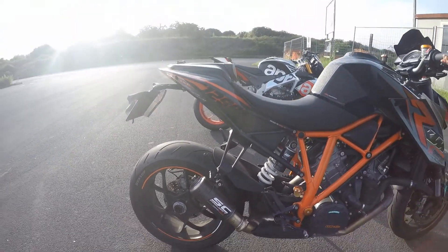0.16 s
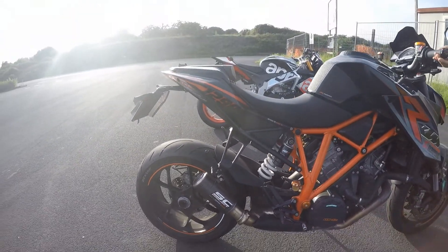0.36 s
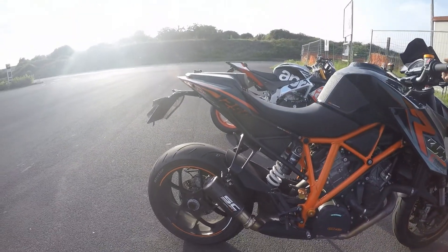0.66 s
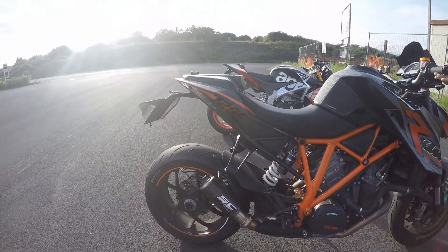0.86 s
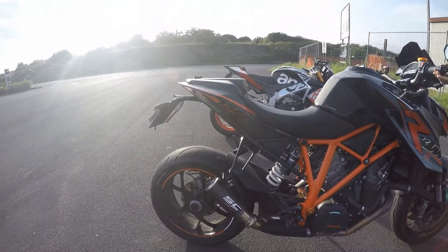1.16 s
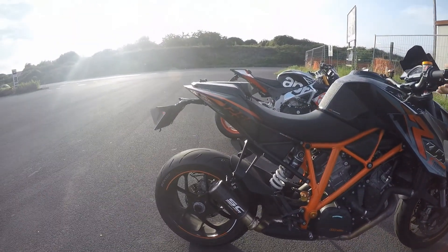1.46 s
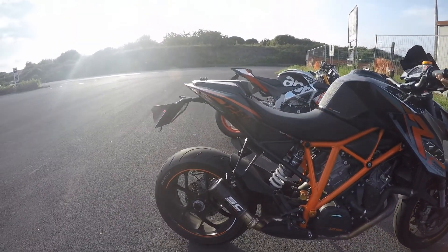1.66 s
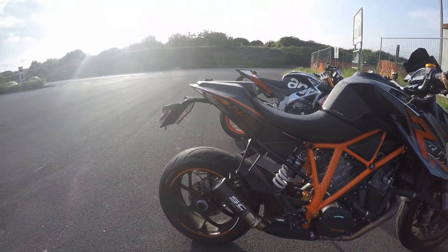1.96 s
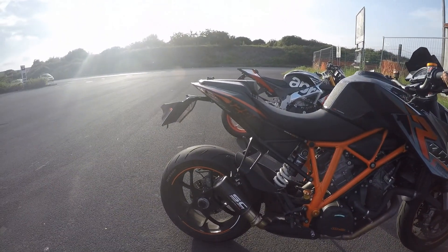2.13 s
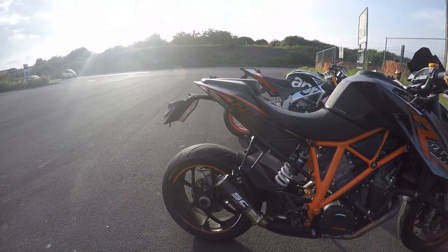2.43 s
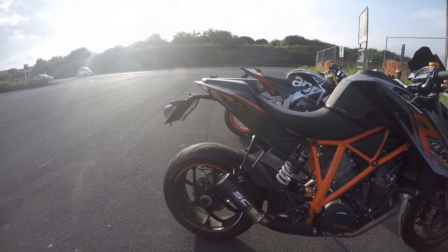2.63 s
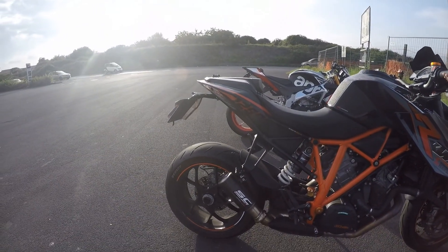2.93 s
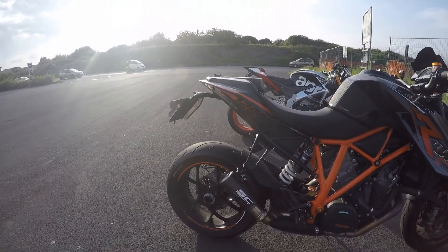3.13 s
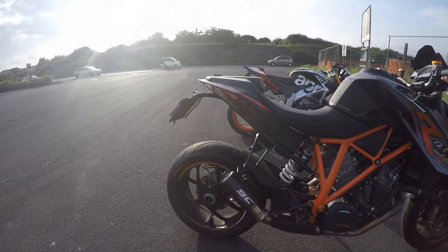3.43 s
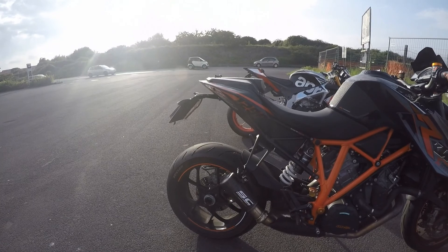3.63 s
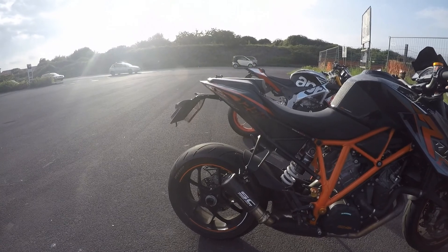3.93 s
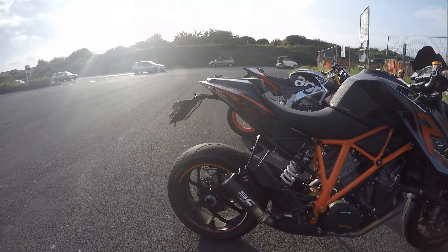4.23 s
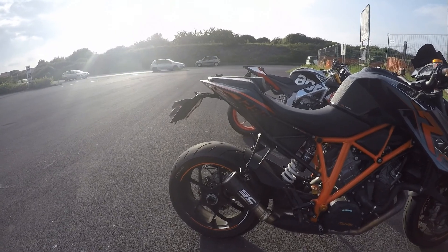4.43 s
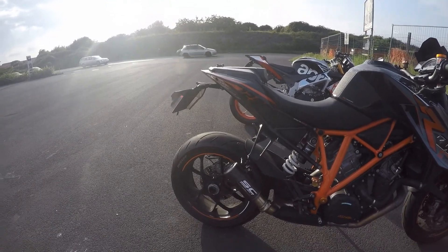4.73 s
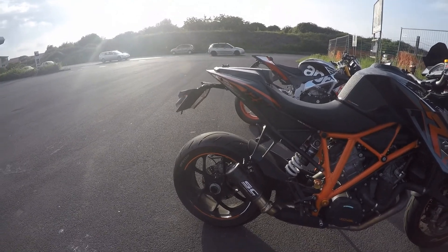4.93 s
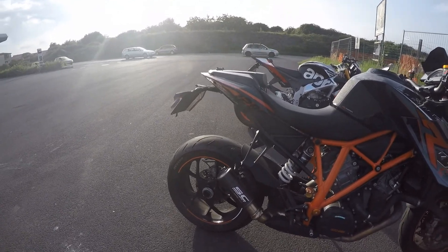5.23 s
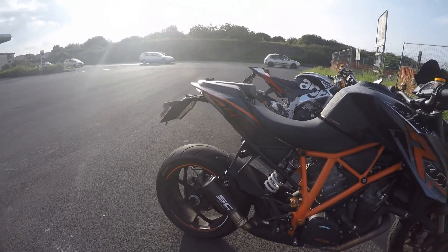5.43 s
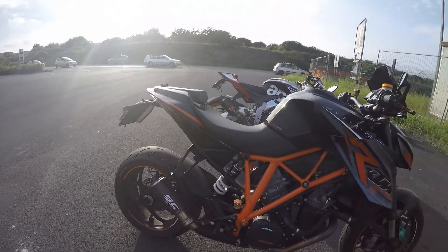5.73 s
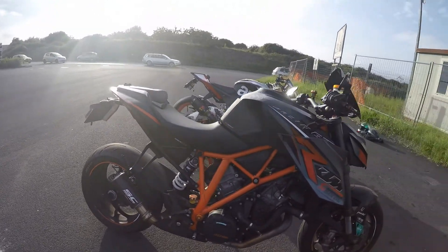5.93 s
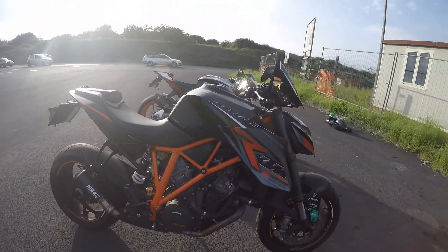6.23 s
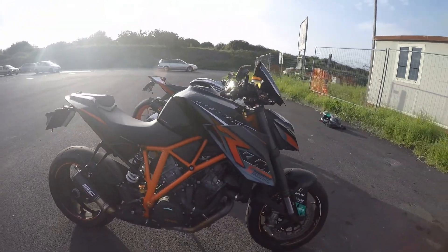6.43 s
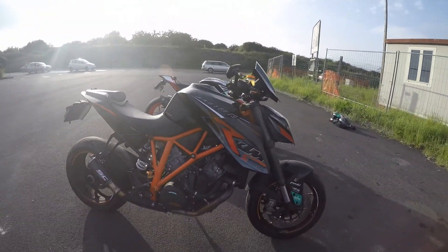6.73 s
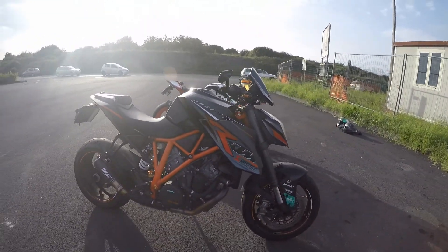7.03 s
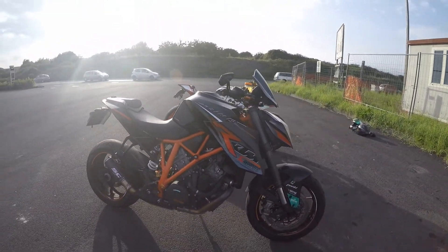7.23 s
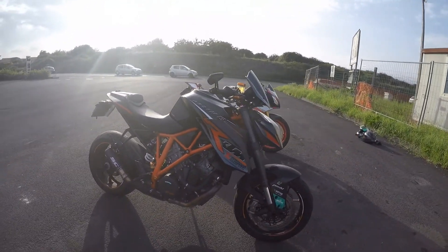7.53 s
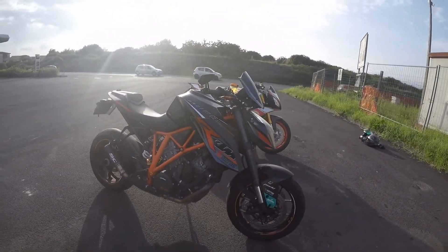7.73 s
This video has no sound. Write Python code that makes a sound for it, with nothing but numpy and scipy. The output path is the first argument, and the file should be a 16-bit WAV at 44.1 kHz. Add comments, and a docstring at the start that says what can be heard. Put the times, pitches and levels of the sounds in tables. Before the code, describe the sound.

A big twin-cylinder motorcycle idles outdoors with an uneven thump and mechanical clatter, heard close to its exhaust. It is blipped five times, the second highest, each sharp bark falling away in a round growl with hiss and light gear whine. The engine then returns to idle while the microphone moves round to its side, picking up a few bumps, clicks and a small clink over faint outdoor rumble.

```python
"""A big V-twin motorcycle thumps at idle through a short open silencer, then is blipped five times.
Uneven firings ring the exhaust, the pistons pump on the overrun, valves and gears clatter and whine,
chains and intake hiss at high revs. A faint outdoor rumble lies underneath. Near the end the
microphone is carried round to the bike's flank and picks up a few bumps, clicks and a clink."""
import sys
import numpy as np
from scipy import signal
from scipy.fft import rfft, irfft
from scipy.io import wavfile
from scipy.ndimage import uniform_filter1d

SR = 44100
rng = np.random.default_rng(int(sys.argv[2]) if len(sys.argv) > 2 else 0)


def generate_wav(signal):
    """Clip the signal to [-1, 1] and save it as 16-bit WAV at the path in sys.argv[1]."""
    frames = np.transpose(np.atleast_2d(signal))
    scaled = np.clip(frames, -1, 1) * 32767
    pcm = np.round(scaled).astype(np.int16)
    wavfile.write(sys.argv[1], SR, pcm)


N = 347067
T = np.arange(N) / SR
BIN_HZ = np.arange(N // 2 + 1) * SR / N + 1e-3

# outdoor rumble spectrum: freq_hz, gain_db
AIR_EQ = [(20, -49), (60, 31), (150, 25), (500, -51.5), (2000, -33), (15000, -67)]
# microphone bumps: centre_s, level_db, pitch_hz, width_s
MIC_BUMPS = [(6.324, -3, 30.4, 0.0057), (6.425, -11, 30, 0.0133), (6.618, -11, 26.2, 0.023),
             (6.804, -15, 23.4, 0.032)]
# microphone housing clicks: start_s, click_db, decay_s, thud_db
MIC_CLICKS = [(6.617, -28, .004, -30), (6.687, -33, .002, -50), (6.78, -20, .003, -5),
              (7.117, -31, .006, -50), (7.432, -7.5, .0009, -40)]
# housing click spectrum: freq_hz, gain_db
HOUSING_EQ = [(300, -20), (600, -2), (1100, 9), (1700, -1.5), (2800, 4), (4000, -13), (9000, -40),
              (15000, -52)]
# microphone path from tail to flank: time_s, flank_share
MIC_PATH = [(0, 0.02), (5.2, 0.02), (6.1, 0.45), (7.2, 0.87), (7.87, 0.93)]
# balance along that path: time_s, firing_db, rasp_db, clatter_db
PATH_GAINS = [(0, -4, 3, 2), (2.4, -2, 0.5, 0), (5.1, -3.5, 0.5, -0.5), (5.8, -5, 2.5, 0), (6.4, -5, 1, 1),
              (7.1, -6.5, -0.5, 1.5), (7.87, -4, -4, -0.5)]
# tone change at the flank: freq_hz, gain_db
FLANK_EQ = [(120, -3.5), (340, -9), (800, 3.5), (1300, -6), (2250, -6.5), (2700, 4), (3000, -3),
            (3450, 1.5), (4200, -2.5), (7000, -2), (8200, -3), (10000, -9), (12000, 2)]

# hunting idle, in four-stroke cycles per second: time_s, cycle_hz
IDLE_SPEED = [(0, 12.75), (.2, 11.96), (.66, 11.03), (5, 11.83), (5.4, 11.95), (5.8, 12.26), (6.1, 11.56),
              (7.2, 11.75), (7.87, 11.57)]
# throttle blips: start_s, run_up_s, top_cycle_hz, coast_tau_s, burn_delay_s, burn_length_s
THROTTLE_BLIPS = [(.672, .177, 33.34, .501, .025, .08), (1.373, .206, 52.91, .472, .022, .092),
                  (2.57, .147, 36.62, .55, .005, .085), (3.245, .163, 44.49, .474, -.008, .098),
                  (3.905, .153, 43.48, .499, .008, .087)]

# gear tones: teeth_per_cycle, gain_db
GEAR_MESHES = [(157, 0), (136, -6), (110, -7), (240, -6)]
# chain and intake hiss spectrum: freq_hz, gain_db
RUSH_EQ = [(400, -26), (750, 1), (1300, -0.5), (2800, 5.5), (5500, -3.5), (8000, -8.5), (11000, -14.5),
           (15000, -25.5)]
# silencer knock spectrum: freq_hz, gain_db
TAP_EQ = [(150, -2), (350, 8), (450, -14), (600, -25), (1400, -16), (1900, 11), (2700, -12), (4800, 5),
          (6200, -35), (10000, -20), (15000, -35)]
# valve knocks: position_cycles, gain_db
VALVE_KNOCKS = [(.25, 2), (.33, -9), (.6, -6), (.7, -9), (.83, -7), (.97, -12)]
# engine case resonances: freq_hz, width_hz, gain_db
CASE_MODES = [(2725, 300, 19), (3142, 1220, 19), (3480, 315, 15.5), (3720, 260, 18), (4122, 1020, 11.5),
              (4645, 420, 15), (5684, 120, 12.5), (6780, 1200, 3), (9920, 980, 0)]
# broad clatter spectrum: freq_hz, gain_db
CLATTER_EQ = [(250, 6.5), (450, -2.5), (620, -18), (900, -9), (1250, -0.5), (1500, -22), (2500, -33.5),
              (4000, -2.5), (5700, 1.5), (6400, -7.5), (7500, -6), (8800, -10.5), (10000, -15.5),
              (11000, -18), (15000, -26.5)]
# silencer shell resonances: freq_hz, width_hz, gain_db
SHELL_MODES = [(1763, 200, 5.6), (1896, 300, 11.8), (2083, 185, 8.4)]
# suction strokes: position_cycles, width_cycles, amplitude
SUCTION_STROKES = [(.21, 0.058, -1.09), (.55, .04, -0.38), (.79, 0.049, -0.65)]
# resonances rung by suction: freq_hz, width_hz, gain_db
GROWL_MODES = [(57, 22, 7.5), (114.5, 33, 12), (185, 64, -5), (382, 180, 12)]
# piston pumping against speed: cycle_hz, gain_db
PUMPING_GAINS = [(11.5, -29), (14, -32), (18, -28.5), (24, -26), (32, -23), (42, -27), (53, -36)]
# exhaust pipe resonances: freq_hz, width_hz, gain_db
PIPE_MODES = [(66, 30, -46), (109.3, 44.7, 7), (198.6, 21, -5.5), (349, 79, 0), (432.7, 13.3, -1.5),
              (864, 59, 1), (1230, 690, -1)]


def undb(db):
    """Decibels to gain."""
    return 10 ** (np.asarray(db) / 20)


def unit(x):
    """Scale to rms 1."""
    return x / np.sqrt(np.mean(x ** 2))


def power_sum_db(*gains):
    """Sum gains by power, in dB."""
    return 10 * np.log10(sum(gain ** 2 for gain in gains))


def bell(x, width):
    """Gaussian pulse, peak 1."""
    return np.exp(-.5 * (x / width) ** 2)


def curves(table):
    """Columns of a timed table, per sample."""
    time_s, *columns = np.transpose(table)
    return [np.interp(T, time_s, column) for column in columns]


def colour(x, eq):
    """Filter by a spectral outline."""
    hz, db = np.transpose(eq)
    return irfft(rfft(x) * undb(np.interp(np.log(BIN_HZ), np.log(hz), db)), N)


def noise(eq):
    """Coloured noise, rms 1."""
    return unit(colour(rng.standard_normal(N), eq))


def ring(x, modes, order=1):
    """Parallel resonances; order 2 steepens the skirts."""
    out = 0
    for hz, width_hz, db in modes:
        b, a = signal.iirpeak(hz, hz / width_hz, fs=SR)
        out = out + undb(db) * signal.sosfilt([np.r_[b, a]] * order, x + 1e-18)
    return out


def wander(rate_hz):
    """Smooth random drift, rms 1."""
    hold = max(int(SR / rate_hz), 1)
    steps = np.repeat(rng.standard_normal(N // hold + 1), hold)
    return unit(uniform_filter1d(steps, hold)[:N])


def tail(x, decay_s):
    """Give each impulse an exponential tail."""
    return signal.lfilter([1], [1, -np.exp(-1 / (decay_s * SR))], x + 1e-18)


def swell(start_s, attack_s, end_s, release_s):
    """Trapezoid envelope, 0-1."""
    return np.clip(np.minimum((T - start_s) / attack_s, 1 - (T - end_s) / release_s), 0, 1)


def passes(cycle, position):
    """Samples where the crank passes a cycle position."""
    return np.flatnonzero(np.diff(np.floor(cycle - position)) > 0)


def knocks(cycle, rows, scatter_db):
    """Crank-locked impulses of scattered size."""
    out = np.zeros(N)
    for position, db in rows:
        at = passes(cycle, position)
        out[at] += undb(db + scatter_db * rng.standard_normal(len(at)))
    return out


def outdoor_air(level_db=-46, drift_db=2):
    """Faint, slowly drifting rumble."""
    return noise(AIR_EQ) * undb(level_db + drift_db * wander(2.1))


def clink(start_s=7.12, decay_s=.022):
    """A small loose part rings briefly."""
    age_s = np.maximum(T - start_s, 0)
    tones = sum(undb(db) * np.sin(2 * np.pi * hz * age_s) for hz, db in ((1170, -31), (2500, -37)))
    return tones * np.exp(-age_s / decay_s)


def mic_handling(thud_s=.002, rebound_s=.0066, rebound=.56):
    """Steps shake the microphone; its housing knocks and clicks."""
    thumps, clicks = np.zeros(N), np.zeros(N)
    for centre_s, db, hz, width_s in MIC_BUMPS:
        thumps += undb(db) * np.sin(2 * np.pi * hz * (T - centre_s)) * bell(T - centre_s, width_s)
    for start_s, click_db, decay_s, thud_db in MIC_CLICKS:
        clicks += undb(click_db) * (T >= start_s) * np.exp(-np.abs(T - start_s) / decay_s)
        age_s = T - start_s - thud_s
        push = np.exp(-(age_s / thud_s) ** 2)
        recoil = rebound * np.exp(-(age_s / rebound_s - 1) ** 2)
        thumps += undb(thud_db) * (push - recoil)
    return thumps + clicks * noise(HOUSING_EQ)


def crank_speed(coast_hz=7.03, bend=1.12):
    """Blips run the crank up; friction drags it towards coast_hz until the idle catches it."""
    idle_hz, = curves(IDLE_SPEED)
    cycle_hz = idle_hz
    for start_s, run_up_s, top_hz, coast_tau_s, *_ in THROTTLE_BLIPS:
        run_up = np.sin(np.pi / 2 * np.clip((T - start_s) / run_up_s, 0, 1)) ** bend
        coast = np.exp(-np.maximum(T - start_s - run_up_s, 0) / coast_tau_s)
        goal_hz = coast_hz + (top_hz - coast_hz) * coast
        start_hz = np.interp(start_s, T, cycle_hz)
        blip_hz = start_hz + (goal_hz - start_hz) * run_up
        cycle_hz = np.where(T > start_s, np.maximum(idle_hz, blip_hz), cycle_hz)
    return cycle_hz


def engine_load(cycle_hz, catch_hz=5.9, fill_s=.013, empty_s=.16, attack_s=.018, release_s=.042):
    """Throttle opening, hard burning and soft idle firing, each 0-1."""
    overrun_throttle, idle_throttle, blip_throttle = .15, .38, .94
    idling = np.clip(1 - (cycle_hz - curves(IDLE_SPEED)[0]) / catch_hz, 0, 1)
    opened, burn = 0, 0
    for start_s, run_up_s, _, _, delay_s, burn_s in THROTTLE_BLIPS:
        onset_s = start_s + delay_s
        # the first crack of throttle brings soft firings back just before the blip
        idling = np.maximum(idling, swell(start_s - .033, .026, onset_s, attack_s))
        opened = opened + swell(onset_s, fill_s, start_s + run_up_s, empty_s)
        burn = burn + swell(onset_s, attack_s, onset_s + burn_s, release_s)
    closed = overrun_throttle + idling * (idle_throttle - overrun_throttle)
    throttle = np.clip(closed + opened * (blip_throttle - closed), 0, 1)
    return throttle, burn, idling


def engine_levels_db(cycle_hz, burn, idling, reference_hz=24):
    """Firing, rasp and clatter grow with speed, jump under load and vary along the microphone path."""
    octaves = np.log2(cycle_hz / reference_hz)
    firing_db = power_sum_db(undb(-13 + 5 * octaves), burn * undb(2), idling * undb(-.5))
    rasp_db = power_sum_db(undb(-30.5 + 5.5 * octaves), burn ** 2 * undb(-22))
    clatter_db = power_sum_db(undb(-28.5 + 6 * octaves), burn ** 2 * undb(-22.5))
    return np.array([firing_db, rasp_db, clatter_db]) + curves(PATH_GAINS)


def gear_whine(cycle, cycle_hz, flicker_db=3, case_cutoff_hz=6300):
    """Meshing teeth whine through the cases; uneven crank rotation smears the tones."""
    whine_db = np.interp(cycle_hz, [13, 19, 25, 34, 50], [-43, -37, -35.5, -37, -39])
    out = 0
    for teeth, db in GEAR_MESHES:
        mesh = teeth * cycle + .2 * wander(130) + .5 * np.sin(4 * np.pi * cycle)
        radiated = 1 / (1 + (teeth * cycle_hz / case_cutoff_hz) ** 8)
        out = out + radiated * np.sin(2 * np.pi * mesh) * undb(db + flicker_db * wander(60))
    return out * undb(whine_db)


def chain_intake_rush(cycle_hz, burn, lag_s=.012, limit_hz=44, reference_hz=48, db_per_octave=23):
    """Chains and intake hiss: steep rise with speed up to a limit, plus a jump under load."""
    lagged_hz = np.minimum(np.interp(T - lag_s, T, cycle_hz), limit_hz)
    speed_gain = undb(-19.5 + db_per_octave * np.log2(lagged_hz / reference_hz))
    load_gain = burn * cycle_hz / reference_hz * undb(-26)
    return noise(RUSH_EQ) * np.hypot(speed_gain, load_gain)


def silencer_tap(cycle, cycle_hz, rasp_db, position=.24, boost_db=9, decay_s=.0029, gone_hz=30):
    """The strongest suction stroke knocks the silencer once a cycle, clear at low revs."""
    hits = knocks(cycle, [(position, 0)], scatter_db=.5)
    envelope = uniform_filter1d(tail(hits, decay_s), SR // 500)
    low_revs = np.clip(2 * (1 - cycle_hz / gone_hz), 0, 1)
    return envelope * low_revs * undb(rasp_db + boost_db) * noise(TAP_EQ)


def rattle(cycle, decay_s, steady, impact_db, scatter_db, count=30):
    """Valve knocks trailing into noise, over small impacts that repeat each cycle; levelled to rms 1."""
    pace = np.gradient(cycle) * SR / 30  # 1 at 30 cycles/s
    bursts = tail(knocks(cycle, VALVE_KNOCKS, scatter_db / 2), decay_s)
    hiss = (steady * np.sqrt(pace) + bursts) * rng.standard_normal(N)
    positions = (np.arange(count) + rng.random(count)) / count
    sizes_db = 3 * rng.standard_normal(count)
    impacts = knocks(cycle, zip(positions, sizes_db), scatter_db)
    sound = unit(hiss) + pace * undb(impact_db) * unit(impacts)
    return sound / np.sqrt(uniform_filter1d(sound ** 2, SR // 6))


def silencer_rasp(cycle, rasp_db):
    """Short impacts ring the silencer shell."""
    blows = rattle(cycle, decay_s=.0013, steady=.37, impact_db=3.5, scatter_db=2.5)
    return undb(rasp_db) * unit(ring(blows, SHELL_MODES, order=2))


def valve_clatter(cycle, clatter_db, cases_db=-4, broad_db=-3):
    """Valve gear and chains clatter in the engine cases."""
    blows = rattle(cycle, decay_s=.005, steady=.71, impact_db=-21, scatter_db=5)
    cases = undb(cases_db) * unit(ring(blows, CASE_MODES, order=2))
    broad = undb(broad_db) * unit(colour(blows, CLATTER_EQ))
    return undb(clatter_db) * (cases + broad)


def piston_pumping(cycle, cycle_hz, throttle, late_cycles=.16, full_width_hz=17, steepen_hz=24):
    """Pistons suck gas through the pipe: a round growl on the overrun, short late gulps at idle."""
    fullness = np.minimum(cycle_hz / full_width_hz, 1)
    phase = cycle - late_cycles * (1 - fullness) + .003 * wander(40)
    # strokes steepen at high revs, adding overtones
    width_scale = fullness * np.minimum(steepen_hz / cycle_hz, 1) ** .68
    wave = 0
    for position, width_cycles, amplitude in SUCTION_STROKES:
        offset_cycles = (phase - position + .5) % 1 - .5
        wave = wave + amplitude * bell(offset_cycles, width_cycles * width_scale)
    wave = unit(wave - wave.mean()) * undb(.7 * wander(35))
    growl = undb(-2) * ring(wave, GROWL_MODES)
    flutter = undb(-27) * unit(ring(rng.standard_normal(N), PIPE_MODES[1:5]))
    vacuum = 1 - .5 * throttle
    speed_db = np.interp(cycle_hz, *np.transpose(PUMPING_GAINS))
    return (wave + growl + flutter) * vacuum * undb(speed_db)


def firing_pulses(cycle, cycle_hz, throttle, firing_db, soft_cycles=.014, sharp_s=.00041):
    """Two cylinders fire unevenly; throttle makes the pulses sharper and more alike."""
    out = np.zeros(N)
    scatter_db = 3.04
    for position, idle_db, open_db in ((0, 0, 0), (.595, -9, -2)):
        for i in passes(cycle, position):
            width_s = (1 - throttle[i]) * soft_cycles / cycle_hz[i] + throttle[i] * sharp_s
            evenness = max(throttle[i], np.interp(cycle_hz[i], [13, 28], [0, 1]))
            cylinder_db = idle_db + evenness * (open_db - idle_db)
            size = undb(firing_db[i] + cylinder_db + scatter_db * rng.standard_normal())
            near = slice(max(i - 500, 0), i + 500)
            out[near] += size * bell(T[near] - T[i], width_s) * sharp_s / width_s
    return out


def exhaust(pulses, cycle_hz, throttle, burn, flow_s=.0051, round_trip_s=.00395, full_flow_hz=29):
    """Pulses ring the pipe and bark straight out under load; turbulent gas cracks in the shell."""
    flow = tail(pulses, flow_s) / (flow_s * SR) * undb(-16 + 4 * (throttle + burn))
    turbulence = undb(12) * flow * rng.standard_normal(N)
    # the open end reflects each pulse inverted; at small throttle this rivals the pulse itself
    echo = np.interp(T - round_trip_s, T, pulses)
    wave = (.27 + .35 * throttle) * pulses - .49 * (1 - .5 * throttle) * echo
    drive = undb(3.5) * (wave + turbulence)
    # fast gas damps the deep modes; only hard, steep pulses reach the upper ones
    deep = ring(drive * undb(-6 * burn), PIPE_MODES[:2])
    middle = ring(drive, PIPE_MODES[2:5])
    upper = ring(drive * throttle, PIPE_MODES[5:])
    front = tail(pulses, decay_s=.002) / (.00048 * SR)
    suck = tail(echo, decay_s=.0011) / (.0042 * SR)
    bark = undb(-6) * burn * (front - .94 * suck)
    gas_speed = np.minimum(cycle_hz / full_flow_hz, 1)
    shell = unit(ring(rng.standard_normal(N), SHELL_MODES, order=2))
    crack = undb(-3) * flow * gas_speed ** 2 * shell
    return deep + middle + upper + bark + crack


def scene():
    """The bike from behind, then from its flank, over outdoor rumble; mono."""
    cycle_hz = crank_speed()
    cycle = np.cumsum(cycle_hz) / SR
    throttle, burn, idling = engine_load(cycle_hz)
    firing_db, rasp_db, clatter_db = engine_levels_db(cycle_hz, burn, idling)
    pulses = firing_pulses(cycle, cycle_hz, throttle, firing_db)
    bike = exhaust(pulses, cycle_hz, throttle, burn) + piston_pumping(cycle, cycle_hz, throttle)
    bike += silencer_rasp(cycle, rasp_db) + valve_clatter(cycle, clatter_db)
    bike += silencer_tap(cycle, cycle_hz, rasp_db)
    bike += gear_whine(cycle, cycle_hz) + chain_intake_rush(cycle_hz, burn)
    flank, = curves(MIC_PATH)
    bike = (1 - flank) * bike + flank * colour(bike, FLANK_EQ)
    return (bike + outdoor_air() + mic_handling() + clink())[None]


def record(dry):
    """20 Hz high-pass, peak clip, steep 15.4 kHz low-pass."""
    sound = signal.sosfilt(signal.butter(1, 20, "high", fs=SR, output="sos"), dry)
    sound = np.clip(sound, -.95, .95)
    return signal.sosfilt(signal.ellip(8, .2, 70, 15400, fs=SR, output="sos"), sound)


dry = scene()
out = record(dry)
generate_wav(out)
```